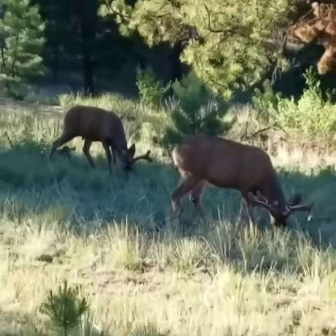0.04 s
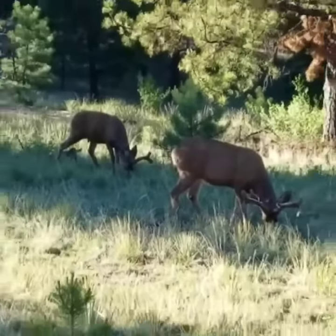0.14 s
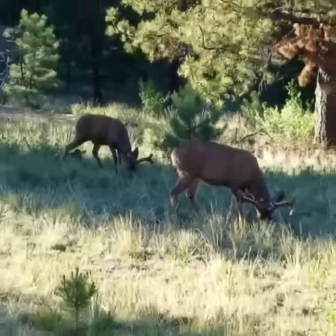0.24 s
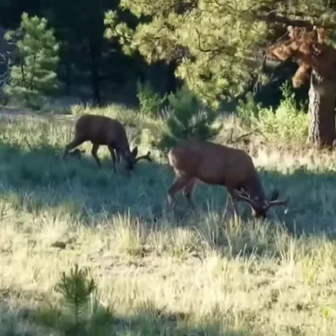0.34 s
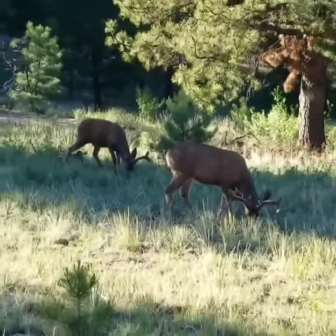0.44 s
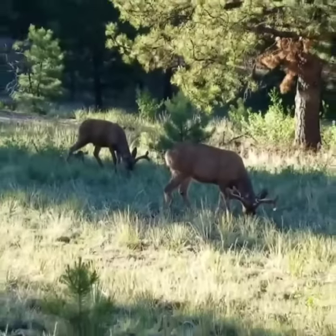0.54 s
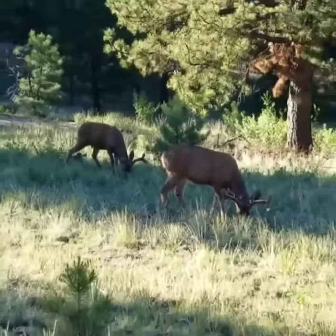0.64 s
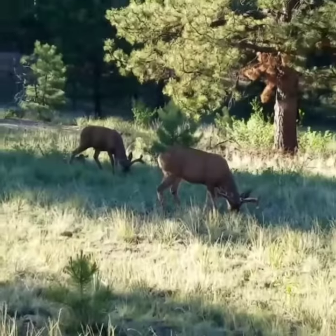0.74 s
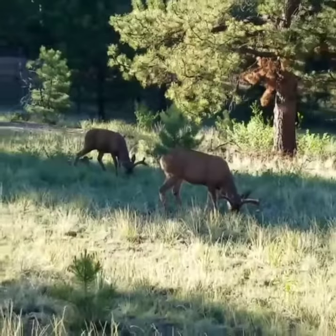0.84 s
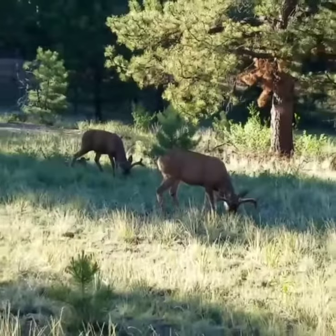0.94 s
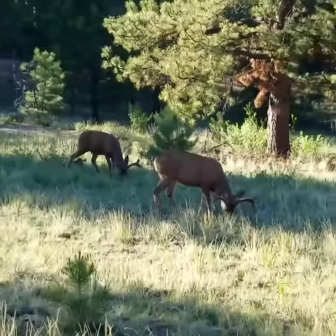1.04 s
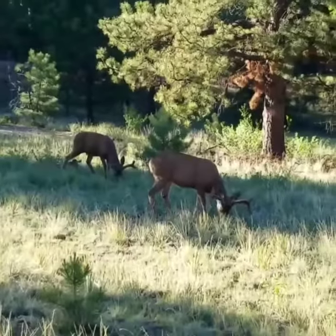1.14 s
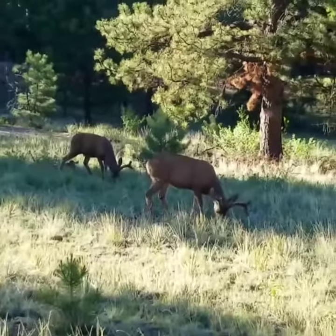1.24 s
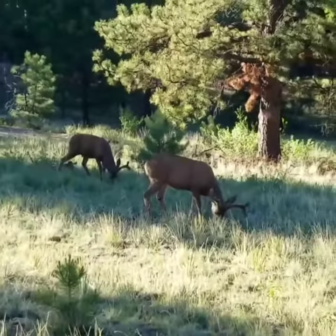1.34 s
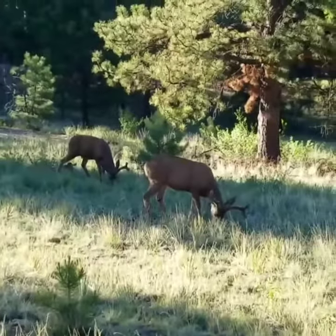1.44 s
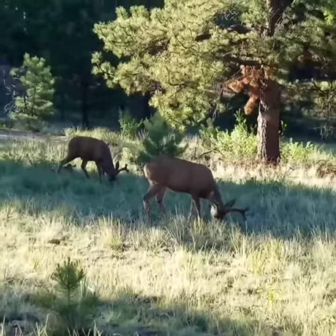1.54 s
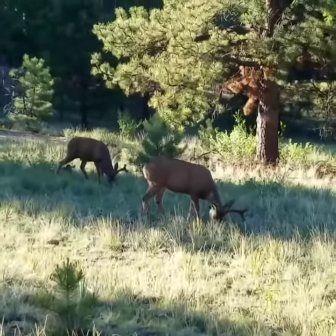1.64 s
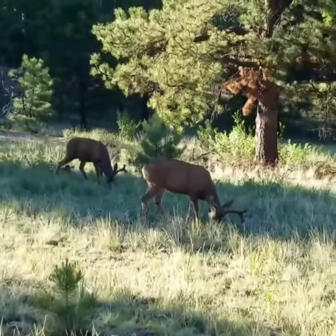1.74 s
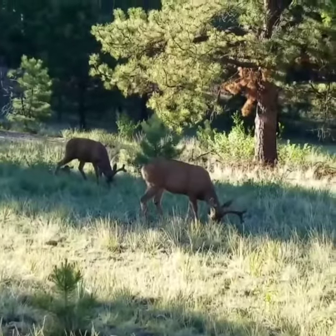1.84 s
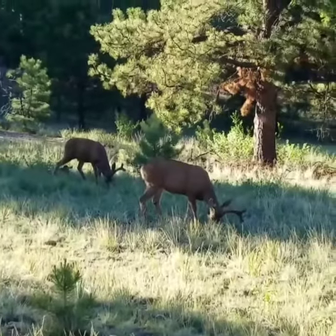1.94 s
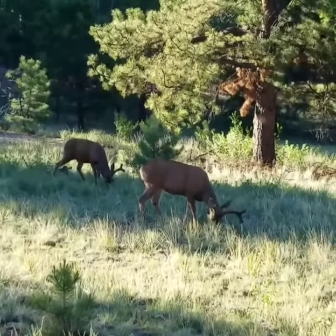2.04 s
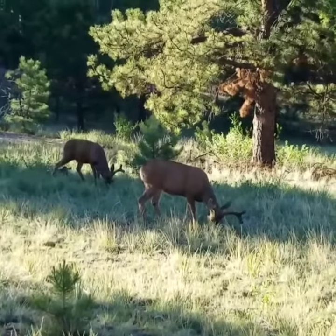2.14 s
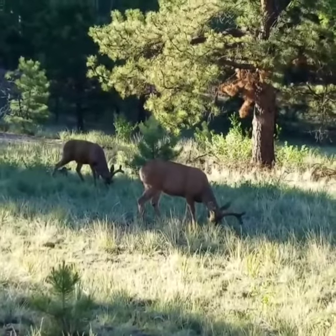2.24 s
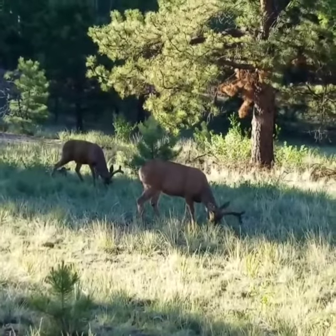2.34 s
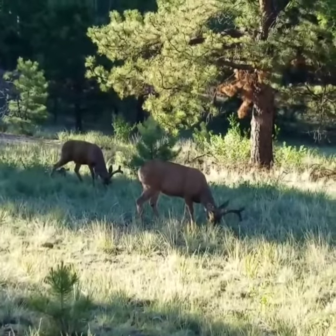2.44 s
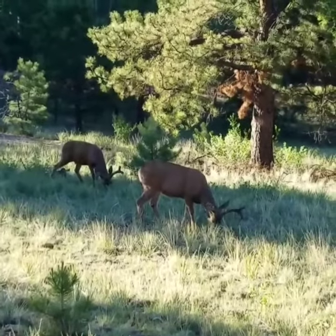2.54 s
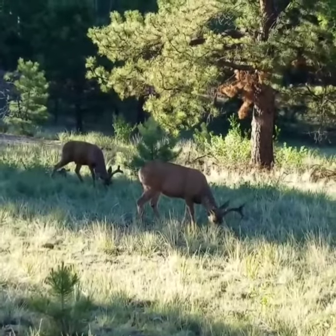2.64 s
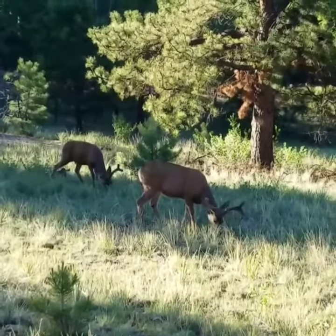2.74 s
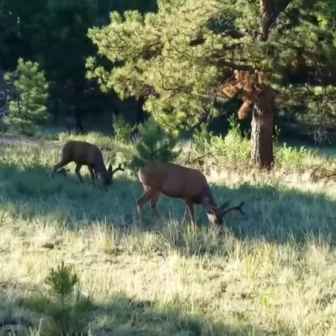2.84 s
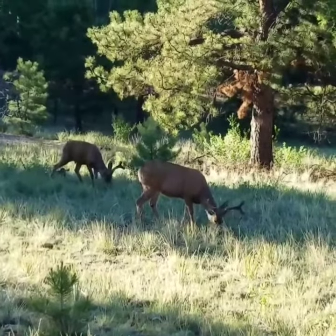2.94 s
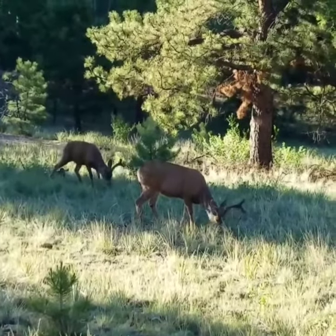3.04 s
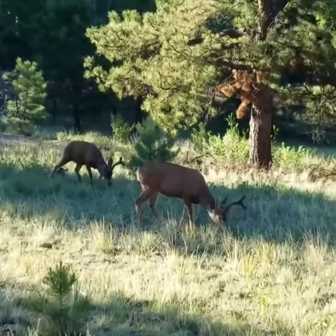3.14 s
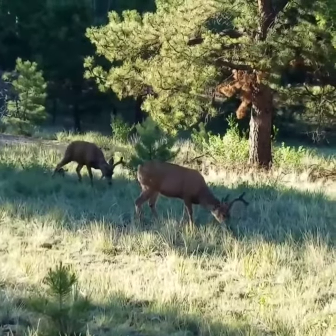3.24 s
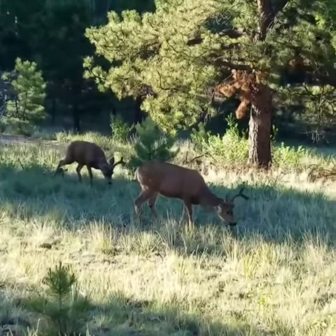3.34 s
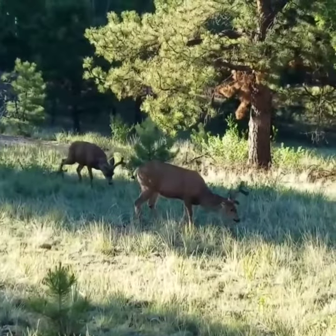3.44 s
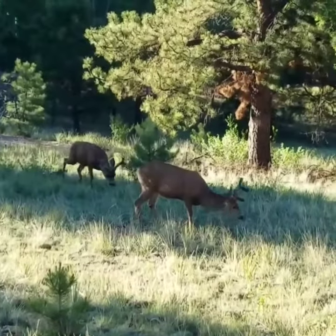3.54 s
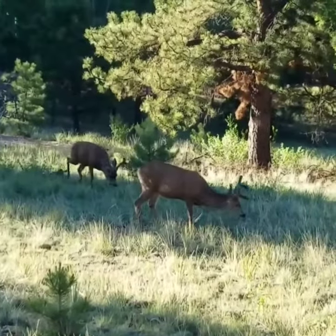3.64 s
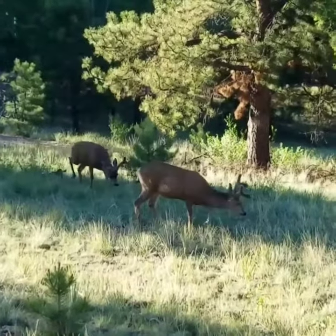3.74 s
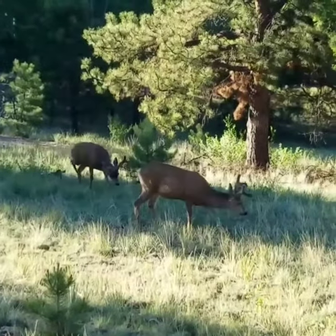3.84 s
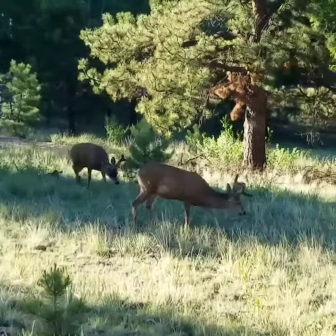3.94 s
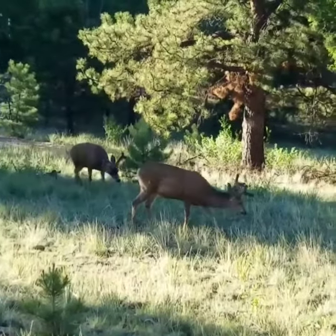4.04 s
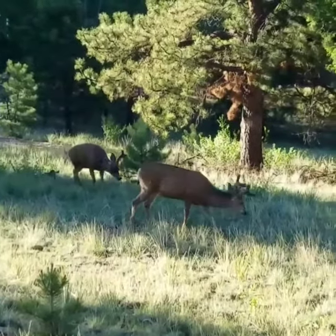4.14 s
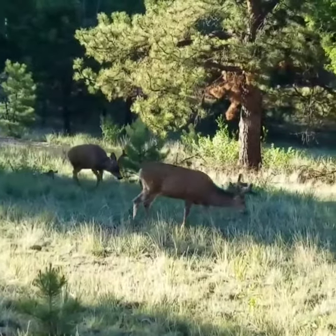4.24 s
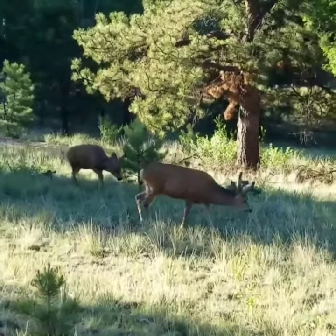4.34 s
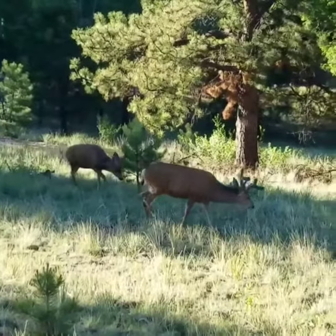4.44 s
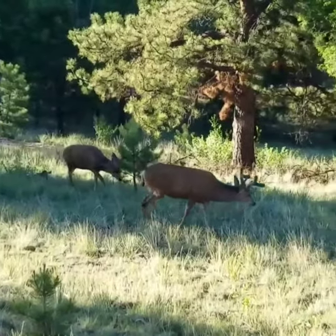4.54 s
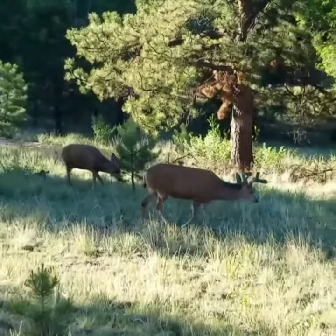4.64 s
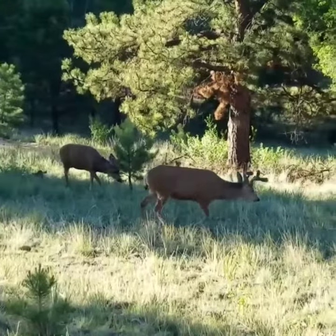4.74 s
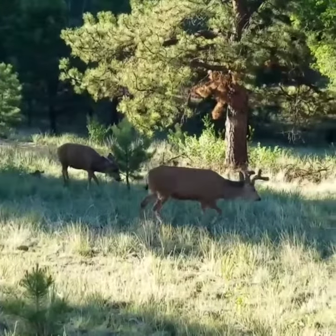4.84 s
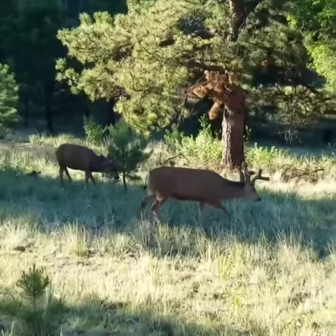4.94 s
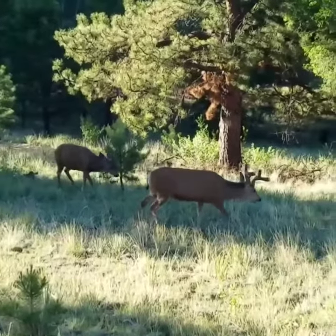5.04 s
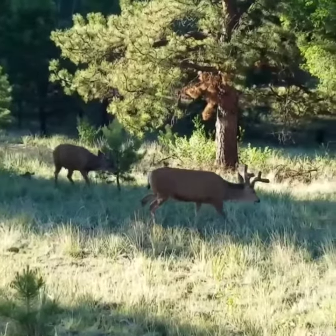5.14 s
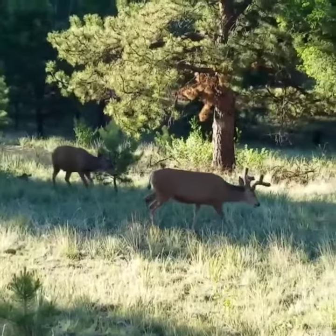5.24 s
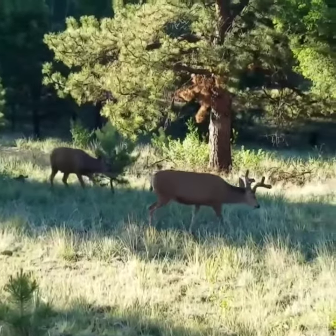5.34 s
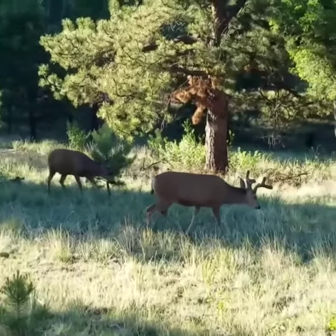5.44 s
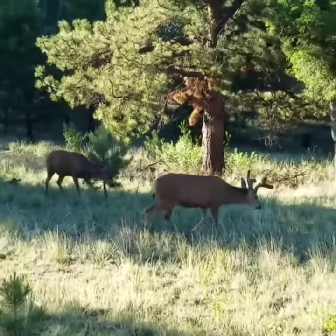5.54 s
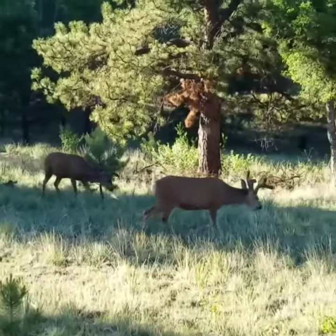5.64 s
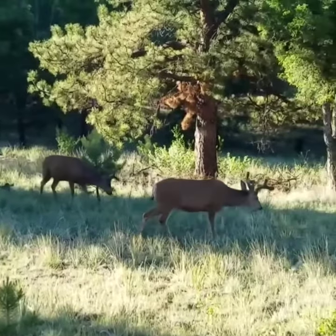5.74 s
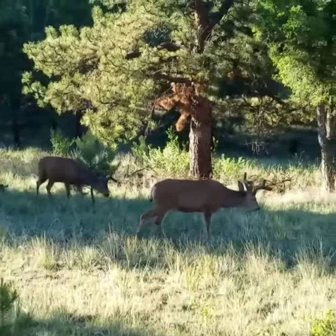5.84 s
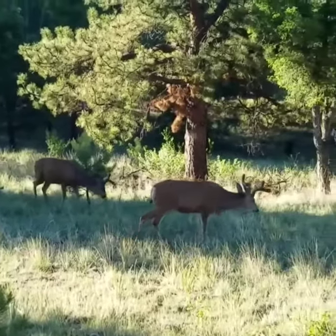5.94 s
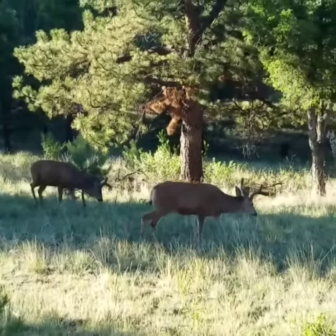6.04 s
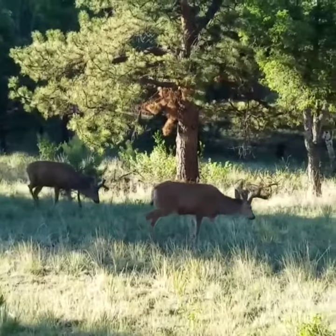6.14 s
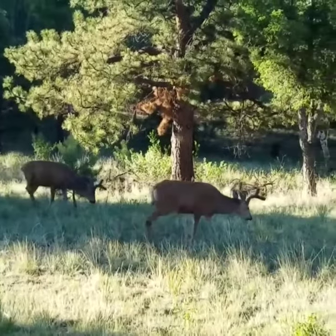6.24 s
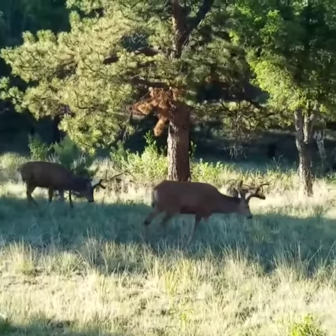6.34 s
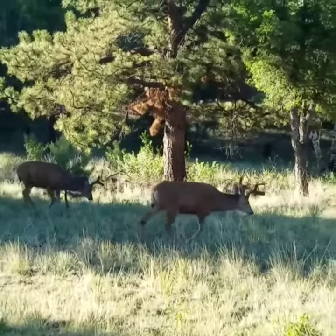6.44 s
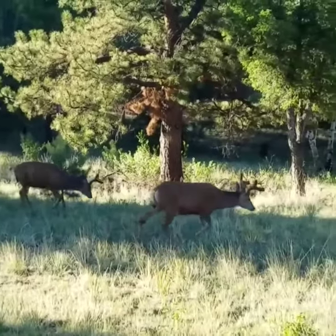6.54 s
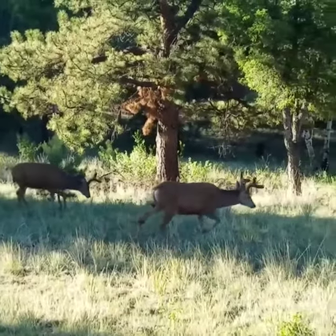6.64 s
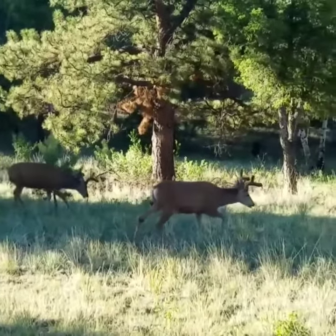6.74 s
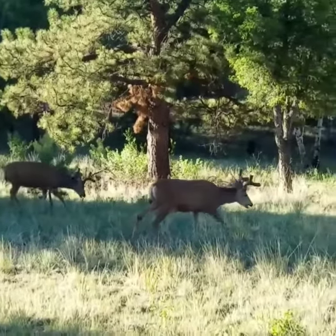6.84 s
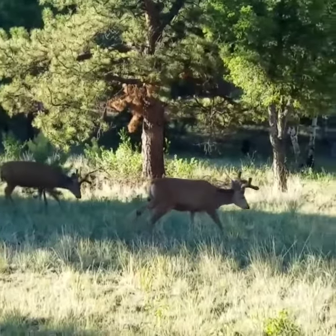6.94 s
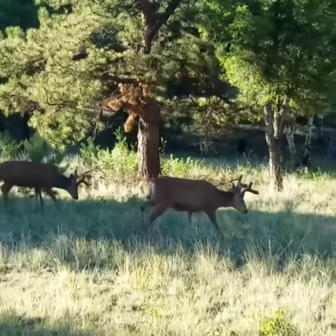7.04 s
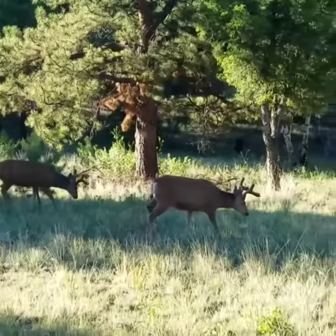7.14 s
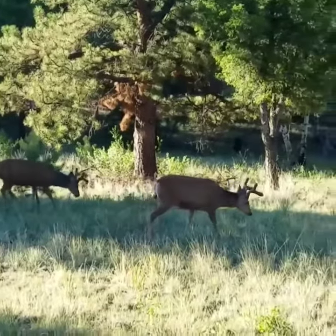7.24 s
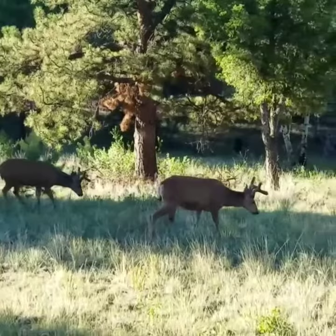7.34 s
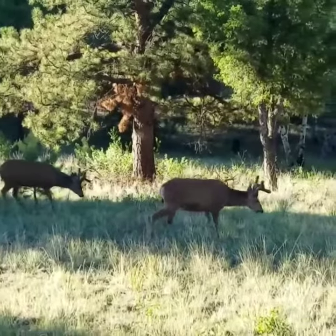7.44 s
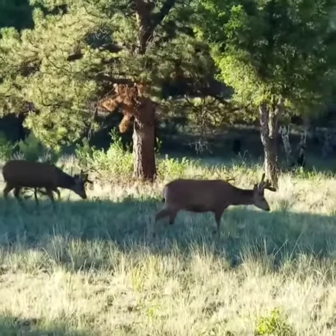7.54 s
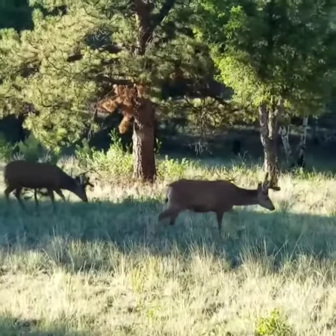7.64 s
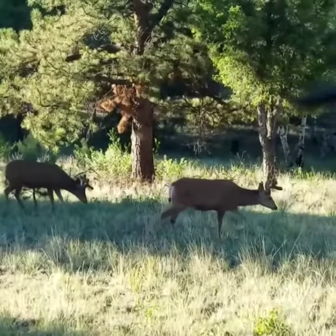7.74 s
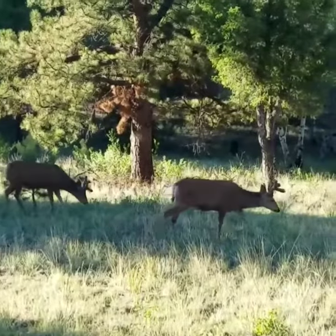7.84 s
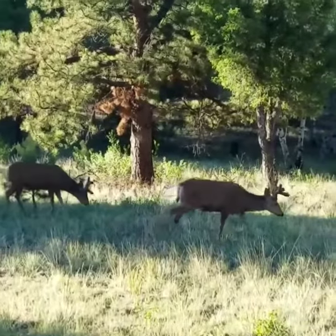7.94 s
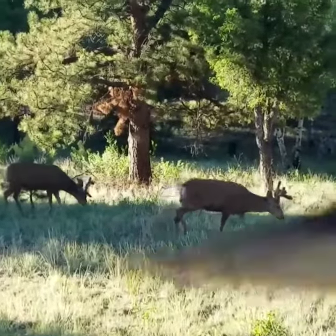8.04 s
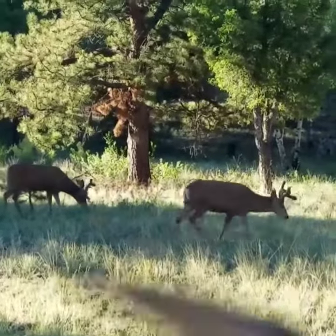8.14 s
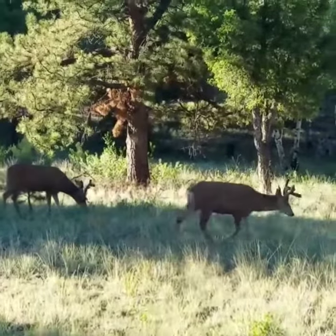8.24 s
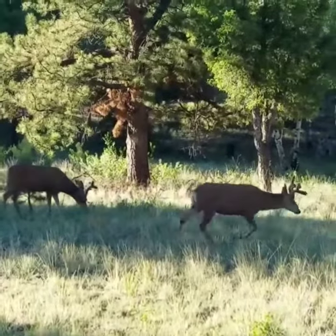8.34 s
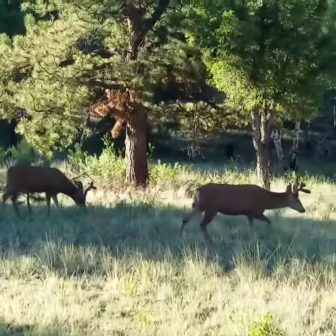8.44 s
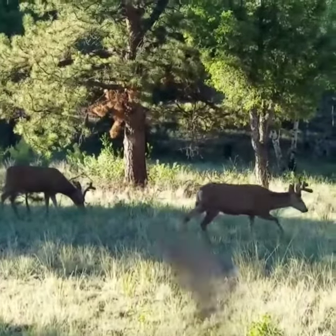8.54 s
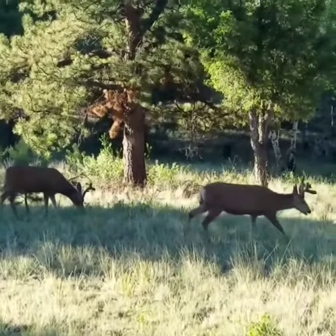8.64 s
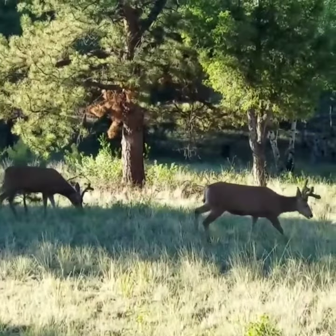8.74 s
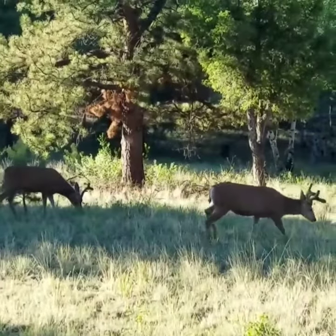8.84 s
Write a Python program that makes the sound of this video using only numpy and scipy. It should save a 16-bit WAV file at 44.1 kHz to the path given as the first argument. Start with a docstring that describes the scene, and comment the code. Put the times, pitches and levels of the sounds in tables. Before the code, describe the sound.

Soft outdoor hush and far chirps, faint at first, until a hummingbird whirs in close, its wings whistling in rapid bursts among hard, scolding ticks.

```python
"""Quiet forest meadow: a hummingbird trills about, then flies right past the listener, scolding with sharp chips.
Each wingbeat hums (harmonics of the beat) and swishes (throbbing noise); in bursts of fast flight the wing-tip
feathers also whistle once a beat (short arched tones). Chips are steeply falling tones with overtones.
Far songbirds (arched tones) call over the forest hush (shaped noise); a faint whirr swells and sinks
(banded noise), with a few soft low bumps (decaying noise)."""
import sys
import numpy as np
from scipy import signal
from scipy.fft import rfft, irfft, next_fast_len
from scipy.io import wavfile
from scipy.ndimage import uniform_filter1d, map_coordinates

SR = 44100
rng = np.random.default_rng(int(sys.argv[2]) if len(sys.argv) > 2 else 0)


def master(y):
    """Save y as 16-bit WAV."""
    cut = np.clip(np.atleast_2d(y).T, -1, 1)
    pcm = np.round(cut * 32767)  # scale
    wavfile.write(sys.argv[1], SR, pcm.astype(np.int16))


N = 392049
TIME = np.arange(N) / SR


def gain_of(db):
    """Decibels to amplitude."""
    return 10 ** (np.asarray(db) / 20)


def evened(x):
    """Scales to rms 1."""
    return x / np.sqrt(np.mean(x ** 2) + 1e-20)


def curve(rows, t=TIME):
    """Table columns after the first, joined by straight lines in time."""
    time_s, *columns = np.transpose(rows)
    return [np.interp(t, time_s, column) for column in columns]


def read_spectrum(points, hz):
    """Interpolates a spectrum on a log-frequency axis."""
    point_hz, value = np.transpose(points)
    return np.interp(np.log(hz + 1), np.log(point_hz + 1), value)


def add(mix, start_s, sound):
    """Adds a sound at a time, cut at the end of the mix."""
    part = mix[round(start_s * SR):][:len(sound)]
    part += sound[:len(part)]


def wander(per_s):
    """Smooth random curve of rms 1, with per_s knots a second."""
    knots = rng.standard_normal(N // 8)
    return evened(map_coordinates(knots, [TIME * per_s], order=2, mode="wrap"))


def smoothed(x, samples):
    """Moving average scaled to rms 1."""
    return evened(uniform_filter1d(x, samples))


def noise(colour, likeness):
    """Stereo noise of rms 1 with a given spectrum and left-right likeness."""
    size = next_fast_len(N, True)
    hz = np.fft.rfftfreq(size, 1 / SR)
    left, other = rfft(rng.standard_normal((2, size)))
    same = np.clip(read_spectrum(likeness, hz), -1, 1)
    right = same * left + np.sqrt(1 - same ** 2) * other
    spectra = np.array([left, right]) * gain_of(read_spectrum(colour, hz))
    return evened(irfft(spectra, size)[:, :N])


def delayed(x, ms):
    """Delays by a fixed or moving time."""
    return map_coordinates(x, [np.arange(N) - ms * SR / 1000], order=3)


def balance(side_db):
    """Left and right gains, side_db apart."""
    return gain_of([[side_db / 2], [-side_db / 2]])


# bird bearing: time_s, left_lead_ms, left_minus_right_db (before the ears share sound)
BIRD_BEARING = [(2.3, -.09, 14), (3.5, -.09, 7), (4.8, -.178, 20), (5.3, -.19, 16), (5.9, -.15, 3),
                (7.15, -.14, 1), (7.38, -.03, 1.5), (7.87, -.025, 3), (8.08, .03, 2.5), (8.17, .12, 7),
                (8.89, .105, 4)]


def at_bird(x, dart_ms=0.017, shared=0.033):
    """Darting flight sets the lead and level of each ear; the two close ports share part of the sound."""
    lead_ms, side_db = curve(BIRD_BEARING)
    lead_ms = lead_ms + dart_ms * wander(25)
    side_gain = gain_of(side_db / 2)
    ears = np.array([x * side_gain, delayed(x, lead_ms) / side_gain])
    constant_power = np.sqrt(np.cosh(np.log(gain_of(side_db))))
    return (ears + shared * ears[::-1]) / constant_power


def scatter(x, t60_s):
    """Grass and trees throw back a diffuse tail, different in each ear."""
    t = TIME[:SR // 2]
    envelope = gain_of(-60 * t / t60_s) * (1 - np.exp(-t / 0.0016))
    tail = rng.standard_normal((2, len(t))) * envelope
    return signal.oaconvolve(x[None], tail / np.linalg.norm(tail[0]), axes=1)[:, :N]


# bursts of fast flight: first_whistle_s, last_whistle_s, beats_between_them, beats_since_previous_burst,
# mid_level_db, level_change_db, end_sag_db, mid_pitch_hz, pitch_glide_hz
FLIGHT_BURSTS = [(2.274, 2.592, 13, 0, -67, -12, 9, 6060, 40),
                 (2.721, 3.545, 35, 5, -65.5, 0, 5, 6260, 319.5),
                 (3.989, 4.26, 11, 18, -62, 1, 6, 6350, 23), (4.781, 4.904, 5, 21, -59.5, -2, 3.5, 6290, 1),
                 (5.133, 5.352, 9, 9, -58.5, -4.5, 2, 6330, -91.5),
                 (6.517, 6.732, 8, 47, -40, -0.5, 17, 6060, -150),
                 (6.836, 7.01, 7, 4, -29.5, -9.5, 6, 6170, -120),
                 (7.037, 7.139, 4, 1, -41.5, 1, 9.5, 6050, 0),
                 (7.365, 7.545, 7, 9, -38.5, 2, 8, 5950, -100), (7.57, 7.771, 8, 1, -41, -7, 15, 5760, -80),
                 (7.798, 7.899, 4, 1, -42, 11, 3, 5770, 248),
                 (8.008, 8.062, 2, 4, -25.5, 4, 5.5, 6070, -150),
                 (8.168, 8.427, 10, 4, -27.5, 1, 9, 6015, -160),
                 (8.507, 8.612, 4, 3, -29, 6.5, 3.5, 5953, 4), (8.751, 8.876, 5, 5, -21, 1.5, 7, 6030, 16)]


def whistles():
    """One whistle a beat through each burst; level arches, pitch glides. Rows: time_s, level_db, pitch_hz."""
    rows = []
    for first_s, last_s, beats, _, db, change_db, sag_db, hz, glide_hz in FLIGHT_BURSTS:
        x = np.linspace(-.5, .5, round(beats) + 1)
        times_s = np.linspace(first_s, last_s, len(x))
        levels_db = db + change_db * x - sag_db * (2 * x) ** 2
        rows += zip(times_s, levels_db, hz + glide_hz * x)
    return np.array(rows)


def nearest_whistle():
    """Index, time, level and pitch of the whistle closest to every moment."""
    time_s, level_db, pitch_hz = whistles().T
    k = np.searchsorted((time_s[1:] + time_s[:-1]) / 2, TIME)
    return k, time_s[k], level_db[k], pitch_hz[k]


CRUISE_BEATS_PER_S = 40.5  # before the first burst and after the last


def wingbeats():
    """Beats flown at every moment: even within a burst, whole numbers on the whistles."""
    first_s, last_s, beats, between = np.transpose(FLIGHT_BURSTS)[:4]
    time_s = np.ravel([first_s, last_s], "F")
    flown = np.cumsum(np.round(np.ravel([between, beats], "F")))
    outside_s = TIME - np.clip(TIME, time_s[0], time_s[-1])
    return np.interp(TIME, time_s, flown) + outside_s * CRUISE_BEATS_PER_S


def effort(from_db=-42.5, full_db=-24.5, smooth_s=0.042):
    """Harder strokes, felt in bursts loud enough to be close: 0 in easy flight, up to 1."""
    _, centre_s, db, _ = nearest_whistle()
    in_burst = abs(TIME - centre_s) < 1 / CRUISE_BEATS_PER_S
    return uniform_filter1d(np.interp(db, [from_db, full_db], [0, 1]) * in_burst, round(smooth_s * SR))


# bird nearness: time_s, nearness_0_to_1
BIRD_NEARNESS = [(5.4, 0), (6.6, 0.51), (6.9, 0.59), (7.15, .5), (7.4, .95)]
# stereo likeness of close air noise: frequency_hz, left_right_likeness
NEAR_LIKENESS = [(30, 0.28), (300, 0.76), (800, 0), (2000, 0.064), (15000, 0)]


def trill(near_length_s=0.0022, far_stretch=1.3, edge=2.25, near_uneven_db=1.5, far_extra_uneven_db=1.5,
          fall=0.027, arch=.025, far_bend=0.23, rasp=0.0177, near_octave_db=-14, far_octave_cut_db=-13,
          rustle_db=-19, echo_db=-19, near_wet_db=-23, far_wet_db=-5):
    """Once a beat the outer feathers flutter: a short arched whistle with its octave and a dry rustle."""
    beat, centre_s, level_db, hz = nearest_whistle()
    loud, tune, span, bend, dry = rng.standard_normal((beat[-1] + 1, 5))[beat].T
    near = curve(BIRD_NEARNESS, centre_s)[0]
    length_s = near_length_s * far_stretch ** (1 - near) * np.exp(.2 * span)
    u = np.clip((TIME - centre_s) / length_s, -6, 6)

    glide = -fall * (1 + 0.52 * bend) * u - arch * (u ** 2 - .25) + rasp * wander(2500)
    # level flight far off keeps the pitch steady; hard turns close by bend it
    bend_depth = np.interp(near, [0, 1], [far_bend, 1])
    phase = 2 * np.pi * np.cumsum(hz * (1 + bend_depth * (glide + 0.014 * tune))) / SR
    # distance dulls the octave
    octave_gain = gain_of(near_octave_db + far_octave_cut_db * (1 - near))
    tone = np.sin(phase) + octave_gain * np.sin(2 * phase)
    strength = gain_of(level_db + (near_uneven_db + far_extra_uneven_db * (1 - near)) * loud)
    whistle = np.sqrt(2) * tone * np.exp(-abs(u) ** edge) * strength

    rustle_colour = [(2000, -43), (4500, 0.5), (6000, 11.5), (8000, 2.5), (9500, -12), (15000, -3.0)]
    rustle = noise(rustle_colour, NEAR_LIKENESS)
    rustle *= gain_of(rustle_db + 4.5 * dry) * np.exp(-u ** 2 / 2) * strength

    # far off, more of it comes by way of the trees
    wet_db = np.interp(near, [0, 1], [far_wet_db, near_wet_db])
    direct = at_bird(whistle + gain_of(echo_db) * delayed(whistle, 5.5))
    return direct + rustle + scatter(whistle * gain_of(wet_db), t60_s=0.13)


# one chip: time_from_start_s, pitch_hz (before the chip's factor), level_db (added to the chip's level)
CHIP_CONTOUR = [(0, 8400, -14), (.002, 6500, -6), (.005, 5000, -2), (.014, 3900, 1), (.026, 3100, -4),
                (.032, 2550, -26)]
# chip overtones: pitch_multiple, level_db
CHIP_OVERTONES = [(1, -0.5), (2, -8.5), (3, -29), (4, -13.5), (5, -32)]
# chips: start_s, level_db (before the contour), pitch_factor, ground_echo_delay_ms, echo_db
CHIP_CALLS = [(5.846, -56, 1.15, 8.4, -8), (5.920, -56.5, 1.09, 8.9, -2), (6.295, -49.5, 1.12, 16, -7),
              (6.559, -44.5, 1.09, 9, -14.5), (6.851, -42, 1.09, 3.7, -11), (6.921, -40, 1.08, 12, -15),
              (7.408, -34, 1.056, 6, -17), (7.485, -35, 1.02, 6, -15), (7.910, -33, 1.082, 12, -16),
              (8.001, -33, 1.046, 4.9, -24), (8.471, -27, 1.093, 5.7, -18), (8.766, -24.5, 1.007, 7.1, -29)]


def chips(rasp=0.016, kink_depth=0.019, shudder=0.24, hiss_db=-20, wet_db=-17):
    """Each chip is a harsh, steeply falling whistle, rich in overtones, with an echo off the ground."""
    out = np.zeros(N)
    t = np.arange(0, CHIP_CONTOUR[-1][0], 1 / SR)
    contour_hz, shape_db = curve(CHIP_CONTOUR, t)
    highpass = signal.butter(4, 3500, "high", fs=SR, output="sos")
    for start_s, db, pitch, echo_ms, echo_db in CHIP_CALLS:
        jitter, hiss, flutter, kink = rng.standard_normal((4, len(t)))
        hz = contour_hz * pitch * (1 + rasp * smoothed(jitter, 12) + kink_depth * smoothed(kink, 200))
        phase = 2 * np.pi * np.cumsum(hz) / SR
        voice = np.zeros(len(t))
        for multiple, partial_db in CHIP_OVERTONES:
            k = round(multiple)
            voice += gain_of(partial_db) * np.sin(k * phase) * (k * hz < SR / 2)
        voice *= evened(1 + shudder * smoothed(flutter, 70))
        hiss = signal.sosfilt(highpass, hiss)
        envelope = gain_of(db + shape_db) * signal.windows.tukey(len(t), .06)
        chip = np.sqrt(2) * (voice + gain_of(hiss_db) * hiss) * envelope
        add(out, start_s, chip)
        add(out, start_s + echo_ms / 1000, gain_of(echo_db) * chip)
    return at_bird(out) + gain_of(wet_db) * scatter(out, t60_s=0.13)


# hum in easy flight, rising as the bird nears: time_s, level_db (before the order levels)
HUM_LEVEL = [(0, -78), (2.1, -74), (2.5, -77), (6.5, -76), (7.08, -72), (7.22, -62.5), (7.4, -68.5),
             (7.9, -67), (8.25, -58), (8.89, -52.5)]
# hum lines: wingbeat_multiple, level_db
HUM_LINES = [(1, -14), (2, -0.5), (3, -9), (4, -8), (5, -13.5), (6, -23), (7, -11.5), (8, -17.5), (9, -16),
             (10, -18), (11, -16), (12, -21)]


def hum(beats, push, effort_db=10.5, waver_db=1.0, side_db=0.5, thin_db=2.0):
    """Down- and upstroke both push the air, so twice the wingbeat is the strongest line."""
    hum_db = curve(HUM_LEVEL)[0] + effort_db * push
    # the bass swells only at close range; farther off the hum is thinner
    far = np.interp(hum_db, [-63, -50], [1, 0])
    lines = np.zeros(N)
    for multiple, db in HUM_LINES:
        order = round(multiple)
        line = np.cos(2 * np.pi * (order * (beats + 0.042 * rng.standard_normal()) + 0.33))
        lines += gain_of(db + waver_db * wander(22) + thin_db * far * (order > 3)) * line
    return np.sqrt(2) * lines * gain_of(hum_db) * balance(side_db)


# air stirred in easy flight: time_s, level_db (before trim_db)
SWISH_LEVEL = [(6.2, -72), (6.6, -59.5), (7.15, -60.5), (7.7, -56.5), (8.1, -54.5), (8.3, -49.5),
               (8.89, -49)]
# swish spectrum: frequency_hz, relative_level_db_per_hz
SWISH_SPECTRUM = [(20, -38), (45, -10), (100, -3), (280, 5.5), (450, -5), (800, -11), (1500, -14),
                  (3000, -25), (8000, -24.5), (10000, -27), (15500, -19.5)]


def swish(beats, push, trim_db=-2.5, effort_db=4.5, beat_depth=0.44, stroke_depth=0.33,
          flick_db=-17, flick_width_beats=0.07, flick_lag_beats=.05):
    """Turbulence behind the wings throbs with each stroke; the wing flip adds a brief, brighter puff."""
    beat_throb = beat_depth * np.cos(2 * np.pi * beats)
    stroke_throb = stroke_depth * np.cos(2 * np.pi * 2 * beats)
    throb = evened(1 + beat_throb + stroke_throb)
    flip_offset = np.sin(np.pi * (beats - flick_lag_beats)) / (np.pi * flick_width_beats)
    flip = evened(np.exp(-flip_offset ** 2) * gain_of(3.1 * wander(40)))
    puff = noise([(150, -25), (400, 2), (900, 4), (2000, 2), (4000, -21), (15000, -23)], NEAR_LIKENESS)
    air = noise(SWISH_SPECTRUM, NEAR_LIKENESS) * throb + gain_of(flick_db) * puff * flip
    arrival = np.clip((TIME - 6.0) / .5, 0, 1)
    return air * arrival * gain_of(curve(SWISH_LEVEL)[0] + effort_db * push + trim_db)


# downwash hitting the microphone: start_s, level_db, decay_s
DOWNWASH_GUSTS = [(8.19, -35.5, 0.0093), (8.775, -39, .015)]
# soft low bumps: start_s, level_db, decay_s
SOFT_BUMPS = [(2.11, -59, .03), (2.45, -62, .055), (2.6, -59, 0.03), (2.87, -58.5, 0.037),
              (2.95, -62, .025), (3.16, -60, .045), (3.59, -63, .04), (3.7, -61.5, 0.032),
              (4.7, -66, 0.064)]
# spectrum of both: frequency_hz, relative_level_db_per_hz
THUD_SPECTRUM = [(20, -22), (50, -2.5), (130, -4.5), (300, -8.5), (450, -25.5), (1000, -33), (4000, -43.5)]


def thuds(rows):
    """Dull puffs of low noise that swell quickly and die away."""
    level = np.zeros(N)
    for start_s, db, decay_s in rows:
        u = TIME[:SR // 2] / decay_s
        add(level, start_s, gain_of(db) * 2 * (1 - np.exp(-4 * u)) * np.exp(-u))
    return level * noise(THUD_SPECTRUM, NEAR_LIKENESS)


# phrases of like notes: start_s, note_count, spacing_s, level_db, first_top_pitch_hz, last_top_pitch_hz,
# note_length_s, end_fall_share_of_pitch
BIRD_PHRASES = [(0.098, 2, .16, -71.5, 2130, 2190, .04, 0.11), (1.114, 1, 0, -72, 2360, 2360, 0.037, .15),
                (1.5, 1, 0, -85, 6850, 6850, .33, .11), (2.843, 2, .045, -71.5, 2230, 1980, 0.036, .12),
                (3.255, 4, .1, -72.5, 2080, 2100, 0.041, .1), (3.315, 3, .087, -71, 2480, 2370, 0.04, .16),
                (3.71, 2, .23, -71, 2420, 2420, .044, .08), (4.019, 3, 0.091, -74, 2260, 2270, 0.039, .09),
                (3.66, 3, .108, -80, 4280, 4260, .044, 0.18),
                (4.051, 6, .125, -79, 3910, 3640, 0.0425, 0.138), (4.532, 1, 0, -85, 6860, 6900, .11, 0.11)]


def songbirds(wet_db=-5, flicker_db=3.7):
    """Distant whistled notes that rise to a point and fall, evenly spaced in a phrase."""
    out = np.zeros(N)
    for start_s, notes, spacing_s, db, first_hz, last_hz, length_s, fall in BIRD_PHRASES:
        u = np.linspace(-1, 1, round(length_s * SR))
        for k, top_hz in enumerate(np.linspace(first_hz, last_hz, round(notes))):
            warble, flicker = (smoothed(z, 250)[:len(u)] for z in rng.standard_normal((2, SR)))
            hz = top_hz * (1 - fall * abs(u) ** 1.3 + .012 * warble)
            tone = np.sin(2 * np.pi * np.cumsum(hz) / SR)
            envelope = gain_of(db + flicker_db * flicker) * signal.windows.tukey(len(u), .3)
            add(out, start_s + k * spacing_s, tone * envelope)
    return out + gain_of(wet_db) * scatter(out, t60_s=0.52)


# whirr swells: middle_s, half_length_s, level_db
WHIRR_SWELLS = [(.75, 0.4, -72.5), (1.71, 0.26, -72.5), (3.502, 0.43, -74.5), (4.66, 0.16, -75.5),
                (6.25, 0.45, -76)]
# whirr spectrum: frequency_hz, relative_level_db_per_hz
WHIRR_SPECTRUM = [(1000, -43), (1800, -5.5), (2020, 3), (2250, -11), (2900, -15.5), (3300, -13.5),
                  (3520, -6), (3800, -15), (6000, -24.5)]


def whirr(rest_db=-83.5, edge=4, waver_db=1.15):
    """Banded noise that swells, holds unsteadily and sinks back to its resting level."""
    power = gain_of(rest_db) ** 2
    for middle_s, half_s, db in WHIRR_SWELLS:
        power = power + gain_of(db) ** 2 * np.exp(-abs((TIME - middle_s) / half_s) ** edge)
    level = np.sqrt(power) * gain_of(waver_db * wander(14))
    return level * noise(WHIRR_SPECTRUM, [(1000, 0.9), (6000, 0.34)])


# hush spectrum: frequency_hz, relative_level_db_per_hz
HUSH_SPECTRUM = [(20, -16), (45, -10.5), (87, -6), (160, -6.5), (260, -4), (405, 0), (560, -3), (754, -0.5),
                 (1290, -7.5), (2000, -15), (2500, -19), (7300, -30), (9800, -31.5), (15000, -22)]
# hush swell: time_s, level_db (added to level_db of hush())
HUSH_RISE = [(0, 1), (1.8, 1.5), (3, 2.5), (4.2, 1.5), (4.7, 3), (5.7, 2), (8.89, 5.5)]
# stereo likeness of the hush: frequency_hz, left_right_likeness
HUSH_LIKENESS = [(30, 0.78), (120, 0.53), (300, 0.82), (500, 0.53), (800, -0.033), (1300, -0.57),
                 (2500, 0.078), (15000, -0.16)]
# hollow tone, one row: centre_hz, width_hz, level_db
HOLLOW_TONE = (400, 27, -76.5)


def hush(level_db=-63, drift_db=0.52):
    """Forest hush: slowly drifting shaped noise."""
    level = gain_of(level_db + curve(HUSH_RISE)[0] + drift_db * wander(5))
    return level * noise(HUSH_SPECTRUM, HUSH_LIKENESS)


def hollow_tone(drift_db=2):
    """Soft hollow tone within the hush: narrow-band noise of drifting level."""
    hz, width_hz, db = HOLLOW_TONE
    band = [(hz / 2, -40), (hz - width_hz, -12), (hz, 0), (hz + width_hz, -12), (hz * 2, -40)]
    return gain_of(db + drift_db * wander(4)) * noise(band, HUSH_LIKENESS)


def meadow(side_db=-1):
    """Hush, hollow tone and whirr, leaning slightly right."""
    return (hush() + hollow_tone() + whirr()) * balance(side_db)


def scene():
    """The hummingbird over the meadow."""
    beats, push = wingbeats(), effort()
    bird = trill() + chips() + hum(beats, push) + swish(beats, push) + thuds(DOWNWASH_GUSTS)
    return bird + songbirds() + thuds(SOFT_BUMPS) + meadow()


def record(dry, edge_hz=16000):
    """The recorder's band limit: a linear-phase lowpass."""
    lowpass = signal.firwin(511, edge_hz, window=("kaiser", 9), fs=SR)
    return signal.oaconvolve(dry, lowpass[None], "same")


dry = scene()
out = record(dry)
master(out)
```